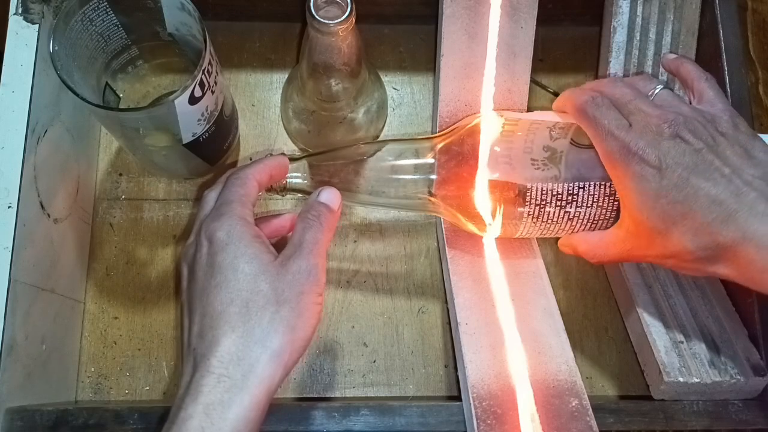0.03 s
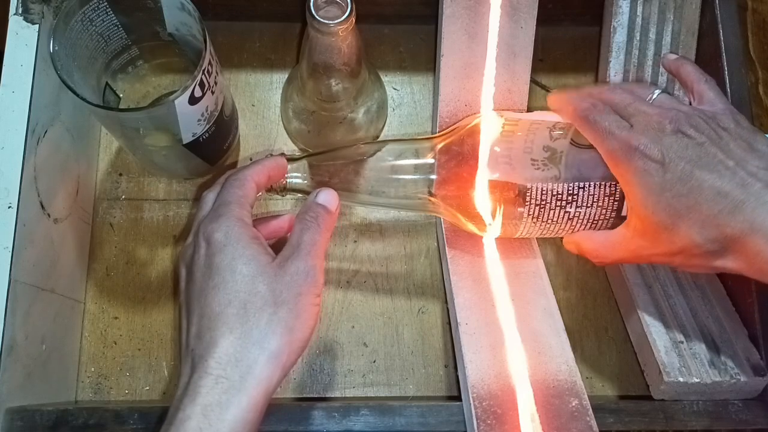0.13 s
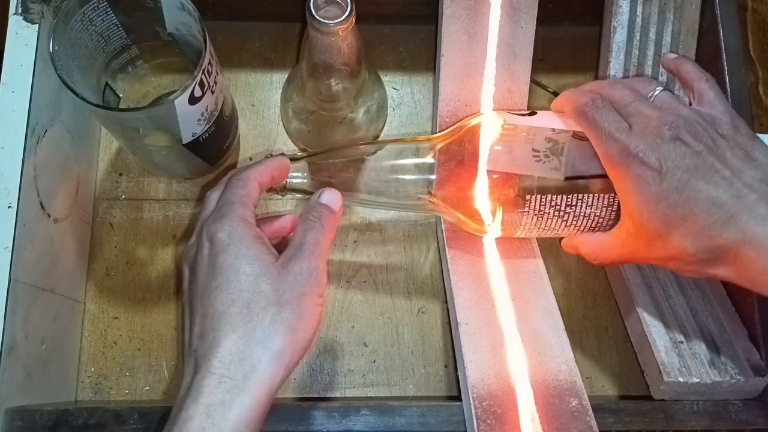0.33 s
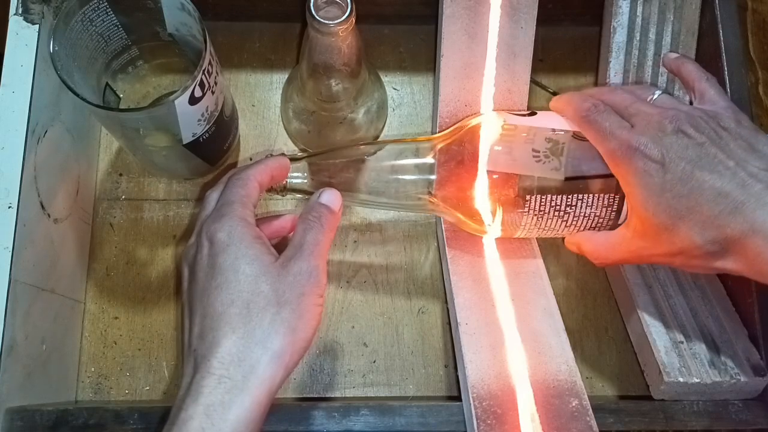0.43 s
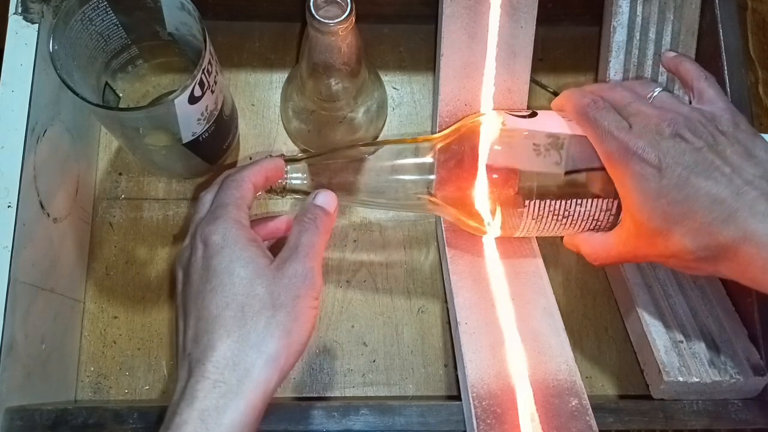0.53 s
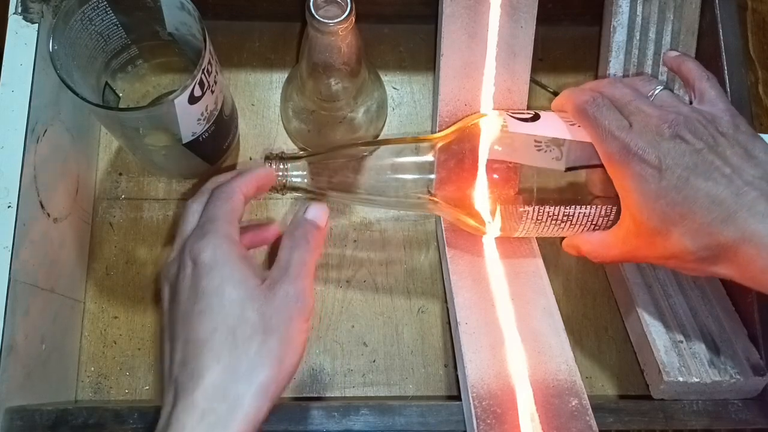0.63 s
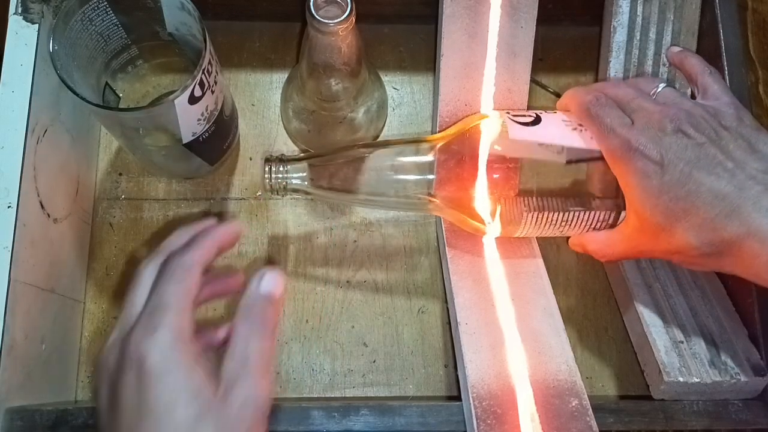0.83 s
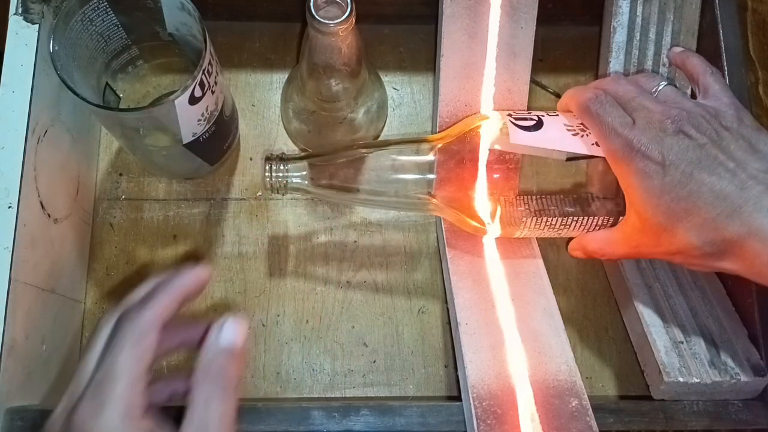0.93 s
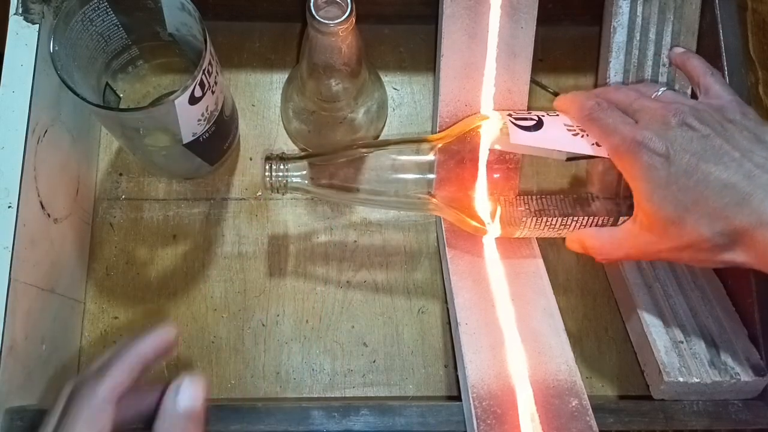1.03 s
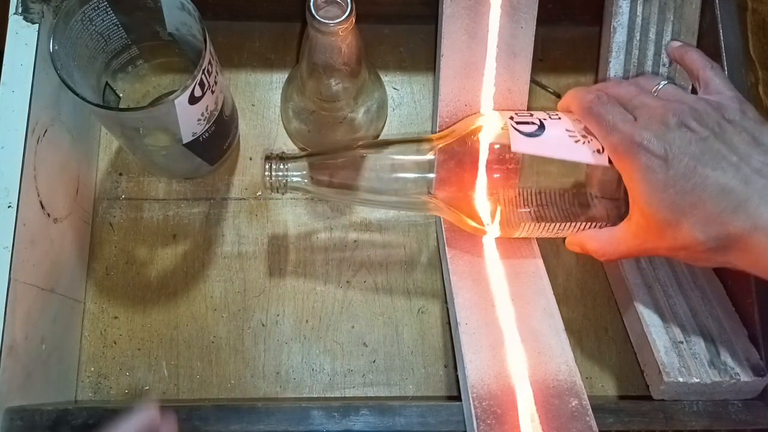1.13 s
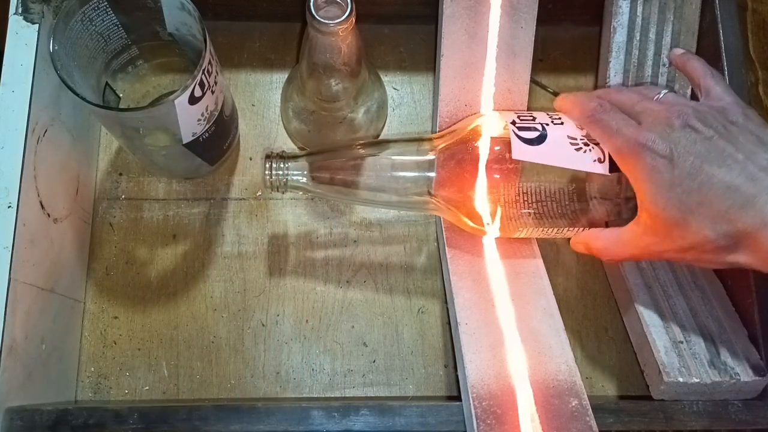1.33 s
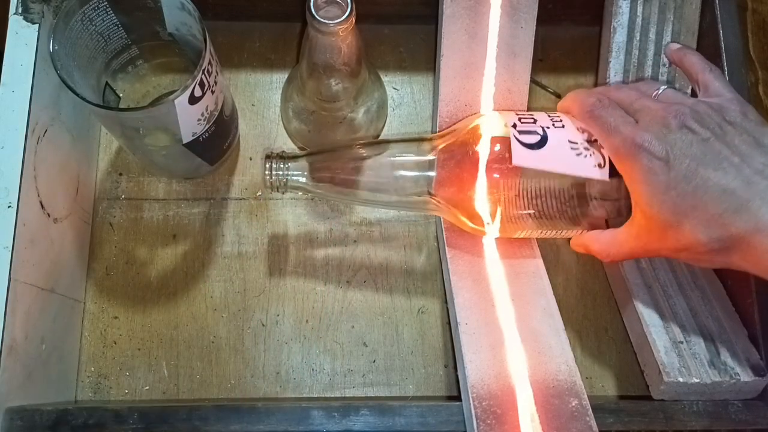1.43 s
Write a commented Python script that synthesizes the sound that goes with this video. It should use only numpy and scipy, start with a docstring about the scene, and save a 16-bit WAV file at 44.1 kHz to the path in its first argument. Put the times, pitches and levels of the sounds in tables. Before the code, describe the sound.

Short woody rubs and glassy scrapes from a bottle turning in a wooden cradle.

```python
"""Short, woody rubs with a glassy scrape, about three a second: a bottle turned by hand in a wooden cradle.
Each turn is a burst of stick-slip that drives the hollow wood, while grit rings the glass. The bottle
knocks, ticks and chirps as it shifts, the bench thumps, and one turn ends in a thin squeak.
Around it sits a small, quiet workshop with a short tail and a low bed of air."""
import sys
import numpy as np
from scipy import signal
from scipy.fft import rfft, irfft
from scipy.io import wavfile
from scipy.ndimage import uniform_filter1d

SR = 44100
rng = np.random.default_rng(int(sys.argv[2]) if len(sys.argv) > 2 else 0)


def master_out(mix):
    """Clip the mix to full scale and print it as 16-bit PCM to the path in sys.argv[1]."""
    frames = np.transpose(np.atleast_2d(mix))
    ceiling = np.clip(frames, -1, 1)
    pcm = np.round(ceiling * 32767).astype(np.int16)
    wavfile.write(sys.argv[1], SR, pcm)


N = 66150

# tone of the still air: freq_hz, level_db
AIR_SPECTRUM = [(20, -45), (38, -1.5), (58, 2), (95, 7.5), (150, 5), (250, -6.5), (450, -16), (800, -19.5),
                (1300, -21.5), (2500, -25.5), (5500, -26.5), (9000, -43), (13000, -37.5), (15500, -38)]
# workshop reverb, band by band: upper_edge_hz, t60_s, level_db
REVERB_BANDS = [(597, 0.17, -8.5), (2030, 0.24, -13.5), (4740, .33, -9.5), (8000, 0.4, -10.5),
                (14800, 0.45, -13)]
# tone of the bench rumble: freq_hz, level_db
RUMBLE_SPECTRUM = [(25, -17), (60, -12), (120, -13), (240, 3), (330, -8), (600, 6), (3000, -56.5)]
# tone of the rasp at the contact: freq_hz, level_db
RASP_SPECTRUM = [(900, -33), (1400, -8.5), (2200, -1), (2750, 0), (3300, -8.5), (3950, 0.5), (4700, -27),
                 (6500, -2.5), (7800, -17.5), (12000, -5), (13300, -41), (14600, 3), (15600, 4)]
# tone of glass clacking on wood: freq_hz, level_db
CLACK_SPECTRUM = [(300, -20), (950, 2), (1170, -8), (1430, 3), (1680, -4), (1950, -3), (2400, -17),
                  (5000, -28), (15000, -55)]
# resonances of the bottle: pitch_hz, width_hz, level_db
GLASS_MODES = [(1415, 50, 1), (1565, 24, -1), (1880, 130, -7), (2855, 28, 2), (3080, 260, -14),
               (3612, 16, 0), (3760, 120, -12), (4120, 100, -5), (7020, 70, -8), (8420, 50, -18),
               (8760, 100, -17), (10180, 70, -23), (11050, 70, -22), (11720, 100, -16), (12200, 120, -13),
               (15020, 110, -15)]
# resonances of the hollow cradle: pitch_hz, width_hz, level_db
WOOD_MODES = [(216, 35, -5.5), (304, 40, -5), (345, 23, -4), (389.3, 47, -2), (413, 20.7, 3),
              (442.8, 22.7, -1), (507, 44, -6), (612.7, 18.6, 6), (677.4, 21, -0.5), (748.2, 27.3, 2),
              (802.4, 33, 0), (873, 34, -4.5), (1025, 28, -2)]
# soft thumps of the bench: start_s, peak_db, pitch_hz
BENCH_THUMPS = [(0.22, -58, 98), (.535, -48.5, 144.5), (0.598, -50.5, 120), (0.807, -57, 113),
                (1.157, -47, 114), (1.182, -42, 121), (1.215, -37.5, 146), (1.278, -54.5, 90.6),
                (1.325, -53.5, 86)]
# glide of the one squeak: time_s, pitch_hz, level_db
SQUEAK_GLIDE = [(.31, 9950, -94), (.322, 9960, -85), (.352, 10170, -81), (.376, 10240, -81),
                (.397, 10110, -82), (.408, 9980, -105)]
# moments when the glass sings: start_s, attack_s, hold_s, level_db
GLASS_CHIRPS = [(.133, .006, .006, -70), (.25, .012, .014, -63), (.295, .015, .025, -64),
                (.41, .012, .015, -75), (.818, .014, .012, -53), (.885, .01, .02, -72)]
# grit crushed under the glass: start_s, peak_db, tilt_db_per_octave
GRIT_TICKS = [(.137, -62, -3), (.82, -50, 3), (1.179, -46.5, 3.5)]
# grit scraping the glass: start_s, attack_s, hold_s, fade_s, ring_db, rasp_db, tilt_db_per_octave
GRIT_SCRAPES = [(-.06, 0.033, 0.018, 0.025, -60, -51.5, -2), (0.206, 0.034, 0.024, 0.032, -55.5, -57, -0.5),
                (0.493, .033, 0.047, 0.03, -58, -58.5, -0.5), (0.798, 0.031, 0.004, 0.033, -49, -49, -3),
                (1.09, 0.069, 0.097, 0.021, -75, -61, -3), (1.408, 0.041, 0.055, .03, -78, -70.5, -1.5)]
# the bottle knocking in its cradle: start_s, body_db, body_hz, clack_db, clack_edge_hz
CRADLE_KNOCKS = [(.21, -38.5, 400, -82, 960), (0.238, -27, 347, -70, 1200), (.246, -28.5, 667, -44, 1550),
                 (.274, -36, 547, -76, 1520), (.311, -42.5, 370, -53.5, 1180),
                 (0.506, -36.5, 387, -80, 1000), (.58, -29.5, 425, -32, 2250), (.812, -27, 546, -49, 1460),
                 (.833, -25, 850, -36, 1680), (1.14, -33, 390, -40.5, 1230), (1.201, -31.5, 680, -39, 2200),
                 (1.428, -42.5, 386, -58, 1180)]
# rubs on the wood, one or two a turn: start_s, attack_s, hold_s, fade_s, rub_db, centre_hz, rumble_db
TURN_RUBS = [(-.06, 0.014, 0.034, 0.029, -42.5, 436, -55), (0.207, 0.019, 0.03, 0.0047, -43, 500, -50),
             (0.231, 0.0067, 0.043, 0.026, -41, 547, -48), (0.485, 0.036, 0.017, 0.021, -48.5, 463, -50),
             (0.523, 0.021, 0.065, 0.025, -41, 593, -48), (0.802, 0.02, 0.016, 0.033, -34, 685, -49),
             (1.098, 0.075, 0.051, 0.024, -49.5, 519, -50.5), (1.407, 0.039, .05, 0.037, -55, 278, -74)]


def undb(db):
    """Decibels to gain."""
    return 10 ** (np.asarray(db) / 20)


def unit(x):
    """Scale to rms 1."""
    return x / np.sqrt(np.mean(x ** 2) + 1e-30)


def steady(x):
    """Ride the level to near rms 1, as friction holds a vibration at constant strength."""
    power = uniform_filter1d(uniform_filter1d(x ** 2, size=900), size=900)
    return x / np.sqrt(power + 1e-30)


def band(x, hz, width_hz):
    """One resonance, gain 1 at its centre."""
    return signal.lfilter(*signal.iirpeak(hz, hz / width_hz, fs=SR), x)


def ring(x, modes):
    """A body as parallel resonances."""
    return sum(undb(db) * band(x, hz, width_hz) for hz, width_hz, db in modes)


def colour(x, points):
    """Minimum-phase EQ through (freq_hz, level_db) points."""
    hz, db = np.array(points, float).T
    size = 2 * N
    bins_hz = np.maximum(np.fft.rfftfreq(size, 1 / SR), 1)
    gain = undb(np.interp(np.log(bins_hz), np.log(hz), db))
    cepstrum = irfft(np.log(gain))
    cepstrum[1:N] *= 2  # folded forward, so nothing rings ahead of a hit
    cepstrum[N + 1:] = 0
    return irfft(rfft(x, size) * np.exp(rfft(cepstrum)))[:N]


def tilted(x, db_per_octave):
    """Tilt the three octaves above 2 kHz."""
    return colour(x, [(2000, 0), (16000, 3 * db_per_octave)])


def clicks(per_s, scatter_db):
    """Random tiny slips of uneven size."""
    chance, size, sign = rng.random(N), rng.standard_normal(N), rng.choice([-1, 1], N)
    return (chance < per_s / SR) * sign * undb(scatter_db * size)


def burst(fade_s):
    """Noise with a hard onset and an exponential fade."""
    return rng.standard_normal(N) * np.exp(-np.arange(N) / SR / fade_s)


def envelope(start_s, attack_s, hold_s, fade_s):
    """Smooth rise, hold, then a fade with time constant fade_s."""
    t = np.arange(N) / SR - start_s
    rise = np.sin(np.pi / 2 * np.clip(t / attack_s, 0, 1)) ** 2
    return rise * np.exp(-np.maximum(t - attack_s - hold_s, 0) / fade_s)


def place_hit(sound, start_s, peak_db):
    """Drop a hit on the timeline at the given peak level."""
    delayed = np.r_[np.zeros(int(start_s * SR)), sound][:N]
    return delayed * undb(peak_db) / np.abs(sound).max()


def room_tone(level_db=-66.5):
    """Still air: a faint, bass-heavy bed of noise."""
    return undb(level_db) * unit(colour(rng.standard_normal(N), AIR_SPECTRUM))


def workshop_reverb(x, predelay_s=0.0033):
    """Add the short diffuse tail of the workshop, each band with its own decay."""
    t = np.arange(N) / SR
    noise = rng.standard_normal(N)
    tail, low_hz = 0, 40
    for high_hz, t60_s, db in REVERB_BANDS:
        wash = signal.sosfilt(signal.butter(3, [low_hz, high_hz], "band", fs=SR, output="sos"), noise)
        decay = unit(np.exp(-np.log(1000) * t / t60_s) * (t > predelay_s)) / np.sqrt(N)
        tail += undb(db) * decay * wash
        low_hz = high_hz
    return x + signal.fftconvolve(x, tail)[:N]


def bench_thumps():
    """Each bump rings the bench on one low, damped note."""
    tap = signal.unit_impulse(N)
    return sum(place_hit(band(band(tap, hz, 0.28 * hz), hz, hz / 2), start_s, db)
               for start_s, db, hz in BENCH_THUMPS)


def squeak():
    """A thin, nearly pure friction squeak as the glass slows."""
    t = np.arange(N) / SR
    time_s, hz, db = np.array(SQUEAK_GLIDE).T
    phase = 2 * np.pi * np.cumsum(np.interp(t, time_s, hz)) / SR
    level = np.interp(t, time_s, undb(db), left=0, right=0)
    return np.sqrt(2) * level * np.sin(phase)


def glass_chirps(pitch_hz=2860, width_hz=55, fade_s=0.012):
    """Light friction locks on to one ring of the bottle."""
    narrow_noise = band(rng.standard_normal(N), pitch_hz, width_hz)
    voice = steady(band(narrow_noise, pitch_hz, width_hz))
    return voice * sum(undb(db) * envelope(*timing, fade_s) for *timing, db in GLASS_CHIRPS)


def grit_ticks(rasp_db=-14.5):
    """Crushed grit pings the glass over a short, broad rasp."""
    crush = burst(fade_s=0.004)
    tick = unit(ring(crush, GLASS_MODES)) + undb(rasp_db) * unit(colour(crush, RASP_SPECTRUM))
    return sum(place_hit(tilted(tick, tilt), start_s, db) for start_s, db, tilt in GRIT_TICKS)


def grit_scrapes():
    """Fine grit keeps the glass ringing while it turns, over the rasp of the contact."""
    grit = clicks(per_s=12000, scatter_db=4)
    glass = steady(ring(grit, GLASS_MODES))
    rasp = unit(colour(grit, RASP_SPECTRUM))
    return sum(envelope(*timing) * tilted(undb(ring_db) * glass + undb(rasp_db) * rasp, tilt)
               for *timing, ring_db, rasp_db, tilt in GRIT_SCRAPES)


def cradle(x, edge_hz=940):
    """The hollow wood rings and soaks up the treble."""
    return signal.sosfilt(signal.butter(4, edge_hz, fs=SR, output="sos"), ring(x, WOOD_MODES))


def cradle_knocks():
    """The bottle shifts and hits the wood: a hollow body with a hard clack on top."""
    wood = cradle(signal.unit_impulse(N))
    bright_clack = colour(burst(fade_s=0.0054), CLACK_SPECTRUM)
    out = 0
    for start_s, body_db, hz, clack_db, edge_hz in CRADLE_KNOCKS:
        body = band(band(wood, hz, 0.17 * hz), hz, 2 * hz)
        clack = signal.sosfilt(signal.butter(3, edge_hz, fs=SR, output="sos"), bright_clack)
        out += place_hit(body, start_s, body_db) + place_hit(clack, start_s, clack_db)
    return out


def bottle_turns(slips_per_s=900, scatter_db=0.5, rumble_lag_s=0.011):
    """Stick-slip drives the cradle; the bench rumbles just behind it."""
    wood = cradle(clicks(slips_per_s, scatter_db))
    rumble = unit(colour(clicks(slips_per_s, scatter_db), RUMBLE_SPECTRUM))
    out = 0
    for start_s, *shape, rub_db, hz, rumble_db in TURN_RUBS:
        rub = steady(band(wood, hz, width_hz=0.49 * hz))
        out += undb(rub_db) * envelope(start_s, *shape) * rub
        out += undb(rumble_db) * envelope(start_s + rumble_lag_s, *shape) * rumble
    return out


def scene():
    """Friction and hits share the workshop reverb, over the room tone, in mono."""
    air = room_tone()
    friction = bottle_turns() + grit_scrapes() + glass_chirps() + squeak()
    hits = cradle_knocks() + grit_ticks() + bench_thumps()
    return (air + workshop_reverb(friction + hits))[None]


def record(dry):
    """A steep high cut at 15.75 kHz on the whole mix."""
    return signal.sosfilt(signal.ellip(10, .2, 70, 15750, fs=SR, output="sos"), dry)


dry = scene()
out = record(dry)
master_out(out)
```